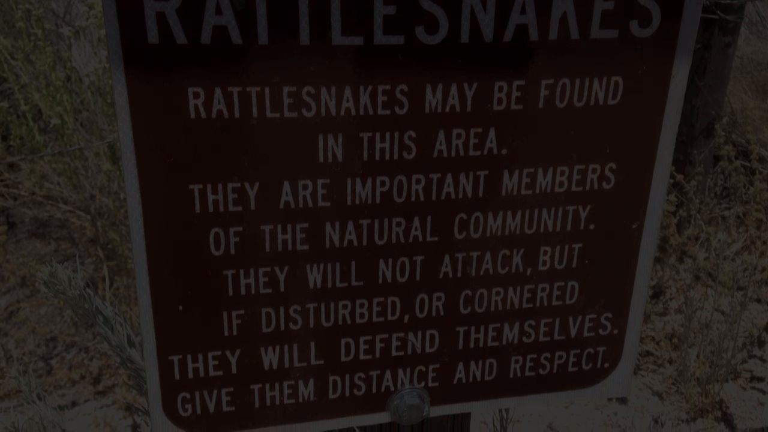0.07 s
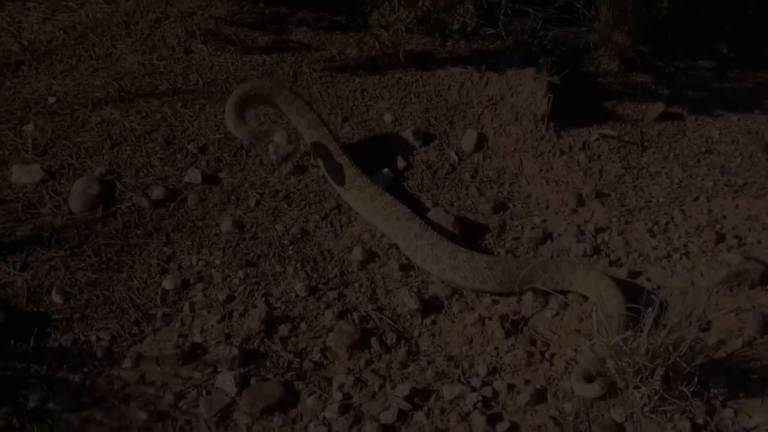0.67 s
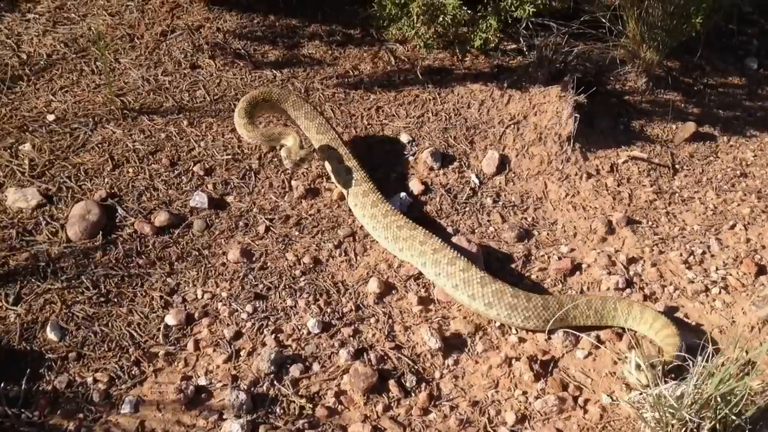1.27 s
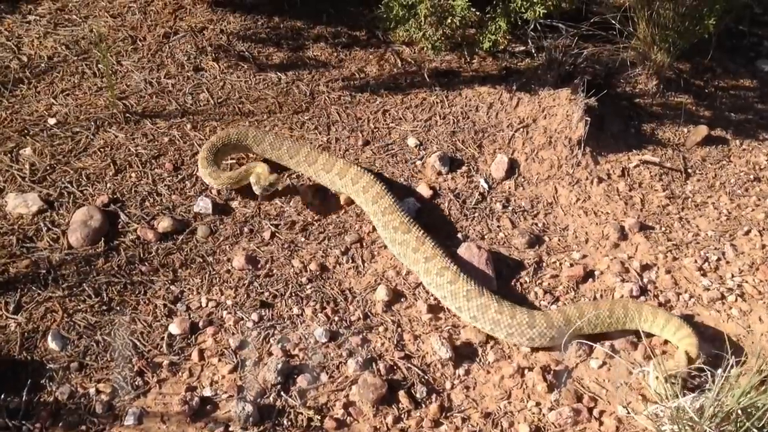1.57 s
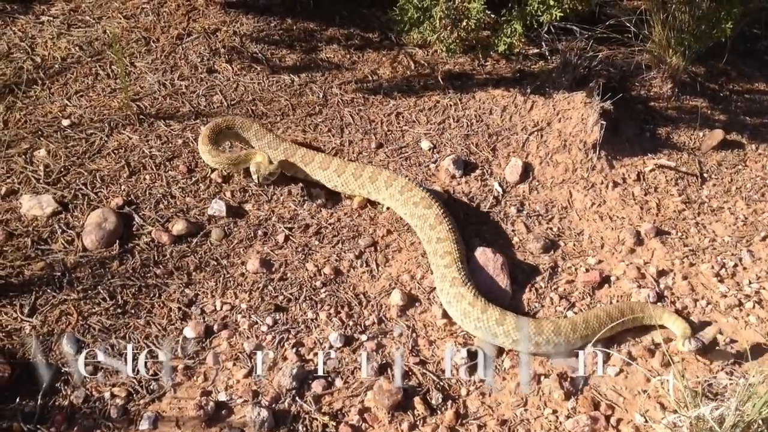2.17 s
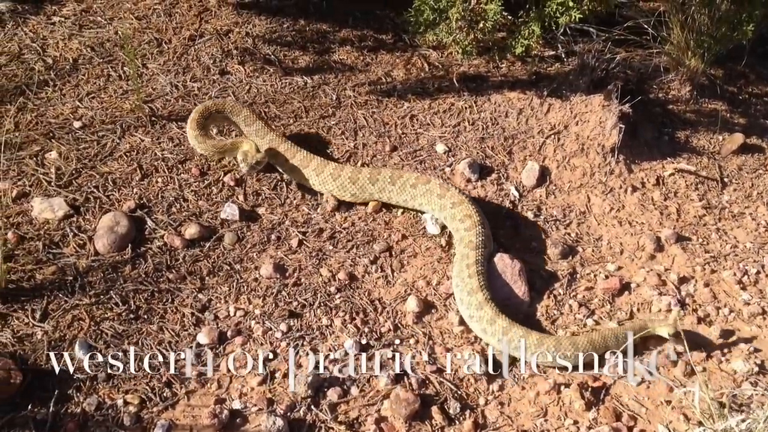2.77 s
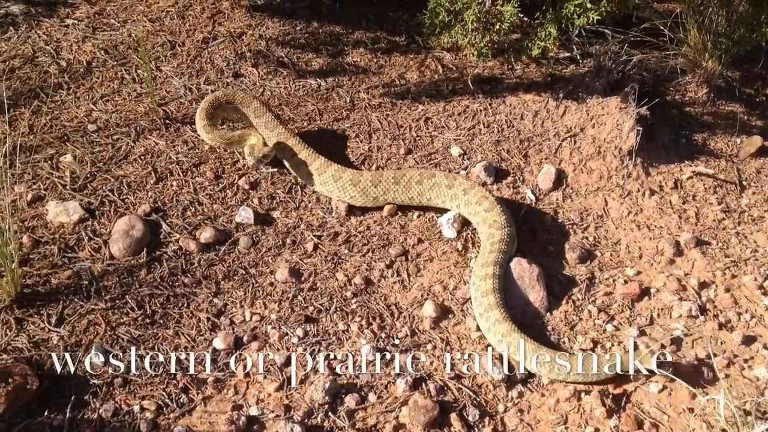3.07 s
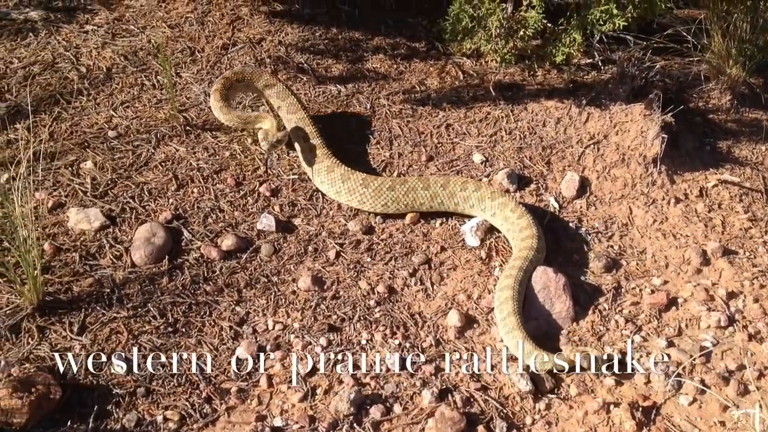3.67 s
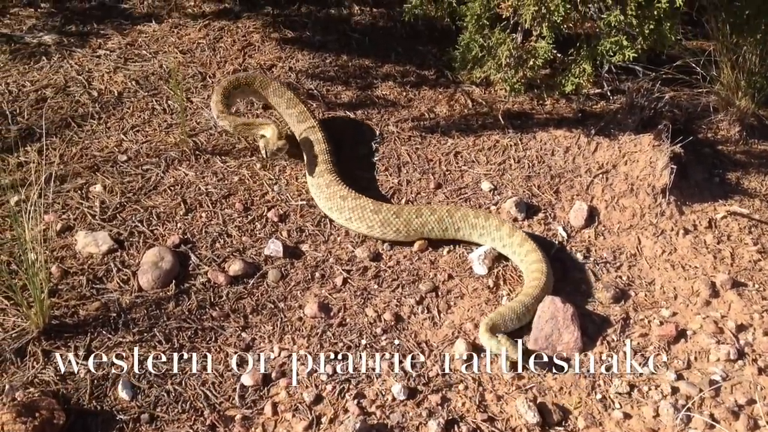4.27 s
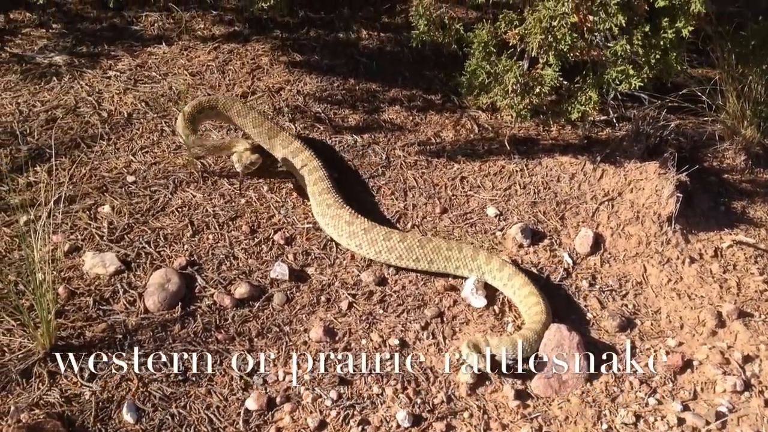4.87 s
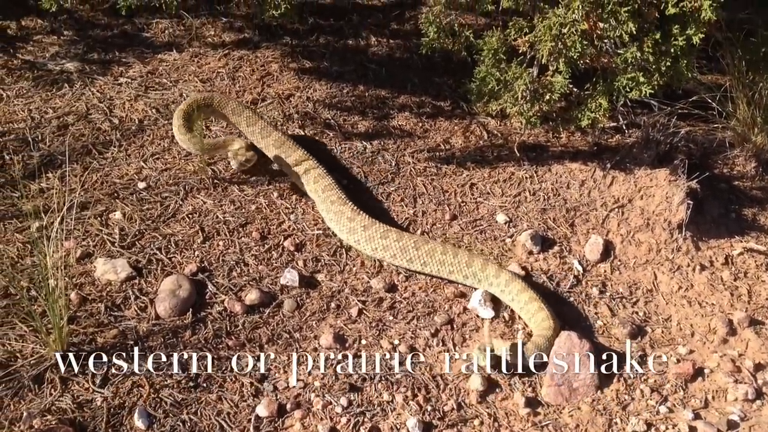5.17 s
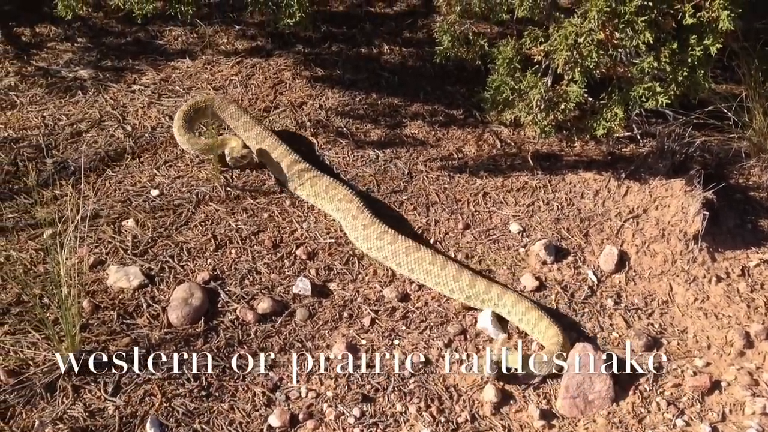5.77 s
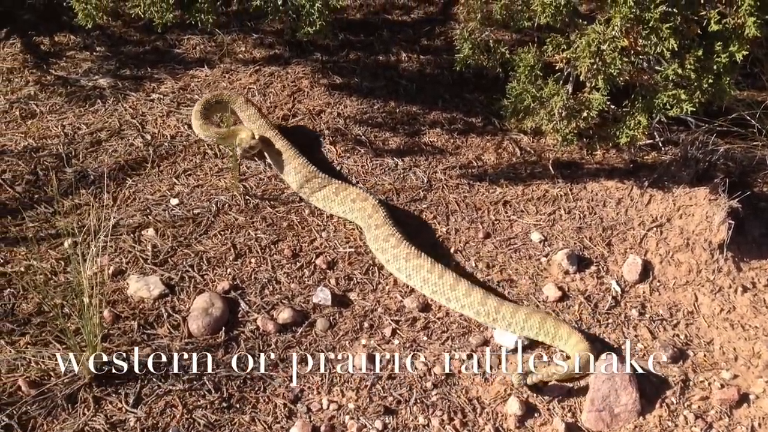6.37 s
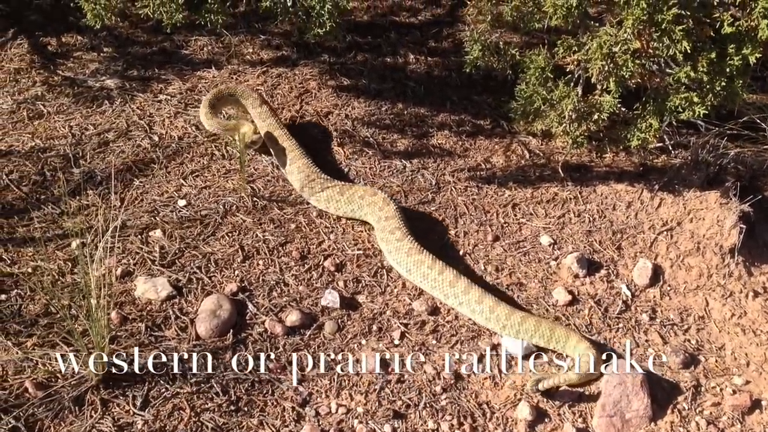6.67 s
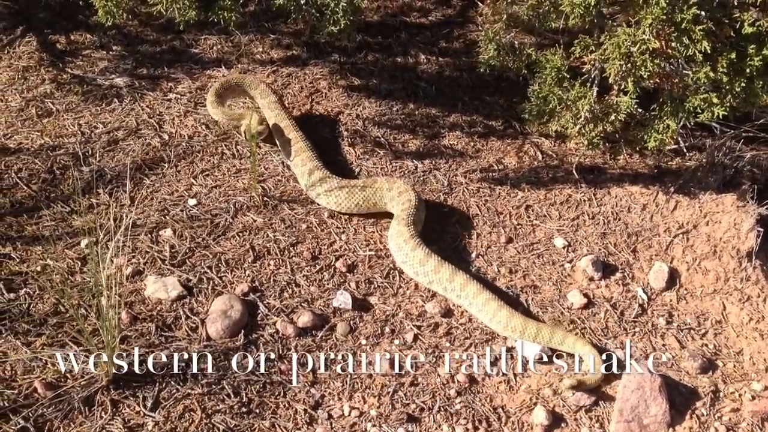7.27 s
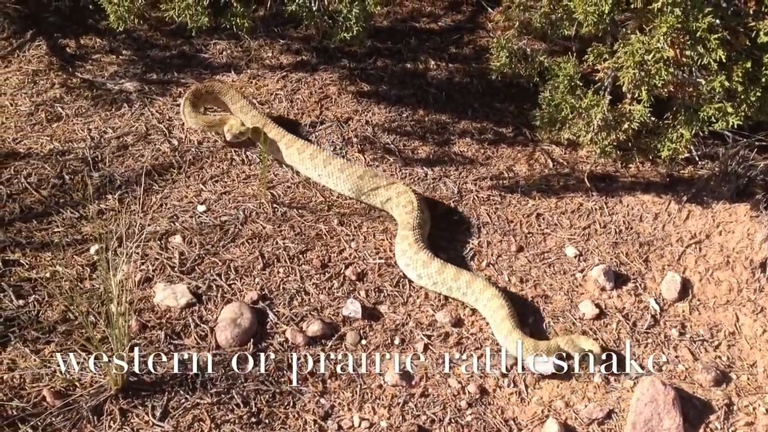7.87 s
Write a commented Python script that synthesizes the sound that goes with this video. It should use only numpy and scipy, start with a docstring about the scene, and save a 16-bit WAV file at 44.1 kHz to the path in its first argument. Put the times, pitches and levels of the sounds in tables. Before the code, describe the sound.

A rattlesnake crawls over dry, open ground. Its dragged rattle gives faint, thin ticks and sizzles, while small pebbles knock, grit snaps and sand rustles briefly under its belly. Light wind rumbles on the microphone over a quiet hush. Past the middle, a distant bird gives six very faint falling notes. Near the end a gust buffets the microphone and the rattle ticks again.

```python
"""Rattlesnake on dry gravel

A rattlesnake crawls over open ground. Its dragged tail rattle ticks and sizzles as the loose
segments click together; pebbles knock, grit snaps and sand slides under its belly. Over a faint
hush, light wind rumbles on the microphone and swells into a gust near the end. A far bird gives
six thin falling notes. The sound fades in after half a second."""
import sys
import numpy as np
from scipy import signal
from scipy.fft import rfft, irfft
from scipy.io import wavfile
from scipy.ndimage import uniform_filter1d

SR = 44100
rng = np.random.default_rng(int(sys.argv[2]) if len(sys.argv) > 2 else 0)


def master_out(mix):
    """Clip the mix to full scale and print it as 16-bit PCM to the path in sys.argv[1]."""
    frames = np.transpose(np.atleast_2d(mix))
    ceiling = np.clip(frames, -1, 1)
    pcm = np.round(ceiling * 32767).astype(np.int16)
    wavfile.write(sys.argv[1], SR, pcm)


N = 348831


def from_db(db):
    """Turn decibels into a number to multiply by."""
    return 10 ** (np.asarray(db) / 20)


def unit_power(x):
    """Scale a signal so that its average power is one."""
    return x / np.sqrt(np.mean(x ** 2) + 1e-20)


def clock():
    """The time of every sample, in seconds."""
    return np.arange(N) / SR


def curve(rows):
    """Join (time, value) points with straight lines, giving one value per sample."""
    return np.interp(clock(), *np.transpose(rows))


def level_at(spectrum, hz):
    """Read a (frequency, level) table between its points, with octaves evenly spaced."""
    points_hz, levels = np.transpose(spectrum)
    return np.interp(np.log(hz), np.log(points_hz), levels)


def drift(rate_hz):
    """A smooth random wobble of typical size one, mostly slower than rate_hz."""
    hz = np.arange(N // 2 + 1) * SR / N
    return unit_power(irfft(rfft(rng.standard_normal(N)) / (1 + (hz / rate_hz) ** 2), N))


def colour(x, spectrum, size=2048):
    """Give a signal the tone in a table; only the differences between its levels count."""
    hz = np.maximum(np.arange(size // 2 + 1) * SR / size, 1)
    bass_cut = np.minimum(hz / spectrum[0][0], 1)
    gain = from_db(level_at(spectrum, hz)) * bass_cut
    # folding the cepstrum makes a filter that rings only after a click, never before it
    cepstrum = irfft(np.log(gain))
    cepstrum[1:size // 2] *= 2
    cepstrum[size // 2 + 1:] = 0
    response = irfft(np.exp(rfft(cepstrum)))
    return signal.fftconvolve(x, response / np.linalg.norm(response))[:N]


def steady(x, span_s):
    """Even out the loudness, holding the power near one over each short span."""
    size = max(int(span_s * SR / 2), 2)
    power = uniform_filter1d(uniform_filter1d(x ** 2, size), size)
    return x / np.sqrt(np.abs(power) + 1e-9)


def grains(per_s, spread_db):
    """Tiny clicks of uneven size at random moments, with an average power of one."""
    sizes = from_db(spread_db * np.minimum(rng.exponential(1, N), 4))
    signs = rng.choice([-1, 1], N)
    happens = rng.random(N) < per_s / SR
    return unit_power(sizes * signs * happens)


def decay(start_s, t60_s):
    """A loudness shape that jumps to one, then falls by 60 dB in t60_s seconds."""
    out, first = np.zeros(N), int(start_s * SR)
    age = np.arange(min(SR // 5, N - first)) / SR
    out[first:first + len(age)] = np.exp(-np.log(1000) * age / max(t60_s, 1e-3))
    return out


def swell(centre_s, half_s):
    """A bell-shaped rise and fall; half_s is about half its length."""
    return np.exp(-.5 * np.minimum(((clock() - centre_s) / half_s) ** 2, 100))


LULL_DB, GUST_DB = -48.5, -28.5   # wind strengths that count as a lull and as a full gust
# Tone of the wind's deep rumble: f/Hz, level/dB
RUMBLE_TONE = [(20, -29), (30, -21), (42, -7), (62, -0.5), (90, -1), (120, -10), (170, -17.5), (260, -35.5),
               (500, -57), (1000, -99.5)]


def rumble(breeze_db, push_power, lull_level_db=-45.5, db_per_wind_db=0.44, lump_db=4):
    """Wind presses on the microphone in soft, deep lumps that grow more slowly than the breeze."""
    level_db = lull_level_db + db_per_wind_db * (breeze_db - LULL_DB) + lump_db * drift(rate_hz=22)
    power = from_db(level_db) ** 2 + push_power
    noise = colour(rng.standard_normal(N), RUMBLE_TONE, size=8192)
    return np.sqrt(power) * steady(noise, span_s=0.079)


# Tone of the buffeting in a lull and in a full gust: f/Hz, level/dB
LULL_TONE = [(120, 0.5), (170, -4.5), (240, -18), (340, -24.5), (480, -38), (680, -61), (960, -70)]
GUST_TONE = [(120, 0.5), (170, -1.5), (240, 4.5), (340, -8.5), (480, -10.5), (680, -26.5), (960, -36)]


def buffeting(wind_power, gain_db=-1, ragged_db=2.04, flutter_db=3.0):
    """Air tumbles at the microphone: faster air is louder, and its smaller whirls sound higher."""
    power = wind_power * from_db(gain_db + ragged_db * drift(rate_hz=41)) ** 2
    gustiness = np.clip((10 * np.log10(power) - LULL_DB) / (GUST_DB - LULL_DB), -.15, 1.05)
    white, noise = rng.standard_normal((2, N)), np.zeros(N)
    edges_hz = 100 * 2 ** (np.arange(8) / 2)   # bands half an octave wide
    for k, (low, high) in enumerate(zip(edges_hz, edges_hz[1:])):
        band = signal.butter(3, [low, high], "band", fs=SR, output="sos")
        hz = np.sqrt(low * high)
        band_db = (1 - gustiness) * level_at(LULL_TONE, hz) + gustiness * level_at(GUST_TONE, hz)
        band_db += flutter_db * drift(rate_hz=25)
        noise += from_db(band_db) * signal.sosfilt(band, white[k % 2])
    muffled = signal.sosfilt(signal.butter(4, 800, fs=SR, output="sos"), noise)
    return np.sqrt(power) * steady(unit_power(muffled), span_s=0.065)


# Strength of the breeze on the microphone: t/s, level/dB
BREEZE = [(0.55, -70.5), (0.9, -90), (1.1, -88), (1.6, -66.5), (1.85, -78), (2.25, -66), (2.52, -89),
          (2.9, -73.5), (3.3, -71), (3.6, -65), (4.1, -80.5), (5.6, -90.5), (5.9, -69), (6.1, -41.5),
          (6.4, -29), (6.62, -38.5), (6.85, -46.5), (6.98, -35.5), (7.09, -43), (7.35, -47), (7.65, -62.5),
          (7.9, -36)]
# Puffs that hit the microphone: t/s, buffeting level/dB, deep push level/dB, half length/s
PUFFS = [(0.677, -58.5, -49, 0.014), (1.06, -71, -50, 0.028), (1.15, -52.5, -44.5, 0.014),
         (1.258, -43.5, -46, 0.0093), (1.428, -49, -48.5, 0.026), (1.734, -75, -48, 0.025),
         (1.943, -54.5, -38, 0.014), (2.03, -57, -47.5, 0.034), (2.159, -51, -64, 0.024),
         (2.371, -45, -42.5, 0.028), (2.893, -52.5, -47.5, 0.015), (2.969, -54.5, -62, 0.018),
         (3.383, -47, -48, .014), (3.531, -50, -42.5, 0.018), (3.642, -50, -37.5, 0.01),
         (3.971, -53.5, -37.5, 0.0044), (4.442, -65, -52, .02), (4.99, -72, -48.5, 0.0073),
         (5.101, -54.5, -52.5, 0.024), (5.425, -63, -44, 0.004), (5.76, -67, -43.5, 0.004),
         (5.963, -50.5, -37, 0.011), (6.083, -39.5, -38.5, 0.019), (6.208, -38, -39, 0.028),
         (6.286, -27, -50, 0.0075), (6.335, -25, -42, .012), (6.391, -28, -44, .02),
         (6.456, -33, -38, 0.0064), (6.54, -23.5, -41, .016), (6.818, -42, -35, 0.0038),
         (7.016, -26, -52, 0.02), (7.193, -43, -33, 0.0074), (7.229, -32.5, -47, 0.0089),
         (7.28, -39.5, -51, .006), (7.338, -40, -53, 0.0088), (7.759, -43, -42, 0.0064),
         (7.829, -32.5, -35.5, 0.0078)]


def wind(wander_db=1, eddy_gain_db=-1, lull_eddy_hz=128.3, db_per_octave=36, swirl_db=-11):
    """A wavering breeze with puffs; each gives a deep push, an eddy (a whirl of air) and a wake."""
    breeze_db = curve(BREEZE) + wander_db * drift(rate_hz=12)
    buffet_power = from_db(breeze_db) ** 2
    push_power, eddies = np.zeros(N), np.zeros(N)
    for t, db, push_db, half_s in PUFFS:
        push_power += (from_db(push_db) * swell(t, 1.86 * half_s)) ** 2
        # the eddy swings the pressure a few times, faster in a stronger puff
        hz = lull_eddy_hz * 2 ** ((db - LULL_DB) / db_per_octave)
        swing = np.sin(2 * np.pi * hz * clock() + rng.uniform(0, 2 * np.pi))
        eddies += from_db(db + eddy_gain_db) * swell(t, .6 * half_s) * swing
        # its wake of finer eddies sits in a longer, weaker swirl
        wake = from_db(db) * swell(t, half_s)
        swirl = from_db(db + swirl_db) * swell(t, 2.3 * half_s)
        buffet_power += wake ** 2 + swirl ** 2
    return rumble(breeze_db, push_power) + eddies + buffeting(buffet_power)


# Tone of the background hush: f/Hz, level/dB
HUSH_TONE = [(100, 14), (250, 8), (420, 12.5), (600, 8), (1000, 2), (1800, -0.5), (3500, -2), (6000, -2.5),
             (9000, -6), (12000, -9.5), (15000, -10.5)]
# Loudness of the hush: t/s, level/dB
HUSH_LEVEL = [(1.65, -69), (1.85, -71), (5.5, -71.5), (7.9, -71)]


def hush():
    """Still outdoor air and microphone hiss make a smooth, faint noise."""
    return from_db(curve(HUSH_LEVEL)) * colour(rng.standard_normal(N), HUSH_TONE)


# Grit and dry stems snapping: t/s, level/dB
SNAPS = [(0.533, -50.5), (2.356, -57), (2.4064, -61), (2.8724, -54), (3.034, -54), (3.1053, -61),
         (4.34, -60), (4.8827, -57.5), (4.95, -57), (5.0804, -60.5), (5.8587, -57.5)]
# Tone of a snap: f/Hz, level/dB
SNAP_TONE = [(600, 6), (1500, -5.5), (3500, -4.5), (7000, -2), (10500, -7), (15000, -13)]


def grit_snaps(gain_db=-1, t60_s=0.009):
    """A bit of grit or a dry stem snaps under the snake in a tiny burst of noise."""
    loudness = sum(from_db(db + gain_db) * decay(t, t60_s) for t, db in SNAPS)
    return colour(loudness * rng.choice([-1, 1], N), SNAP_TONE)


# Pebbles knocking together: t/s, level/dB, f/Hz
KNOCKS = [(0.7618, -56.5, 1350), (0.887, -57, 1140), (1.0612, -48, 3260), (1.063, -56, 3500),
          (1.267, -54.5, 1230), (1.512, -62.5, 830), (1.578, -57.5, 1150), (1.616, -62.5, 1280),
          (1.643, -57, 625), (1.836, -61, 726), (2.164, -62, 890), (2.579, -60, 596), (2.631, -53, 620),
          (2.655, -54.5, 607), (2.662, -57, 1170), (2.954, -57.5, 1200), (3.033, -67, 1900),
          (5.856, -55.5, 432), (6.912, -64, 700)]


def pebble_knocks(gain_db=-3, rise_s=0.00019, crack_db=-20):
    """Stone scuffs on stone: a dry crack and one dull ring that dies almost at once."""
    out, age = np.zeros(N), np.arange(SR // 20) / SR
    for t, db, hz in KNOCKS:
        t60_s = 0.026 * np.sqrt(1500 / hz)   # bigger, deeper stones stay in contact longer
        loudness = (1 - np.exp(-age / rise_s)) * np.exp(-np.log(1000) * age / t60_s)
        scuff = loudness * rng.standard_normal(len(age))
        ring = signal.lfilter(*signal.iirpeak(hz, Q=3.2, fs=SR), scuff)
        band = signal.butter(3, [hz / 2, min(3.5 * hz, hz + 2800)], "band", fs=SR, output="sos")
        knock = signal.sosfilt(band, ring + from_db(crack_db) * scuff)
        knock /= np.std(knock[:SR // 200])   # the first 5 ms set the level
        first = int(t * SR)
        out[first:first + len(age)] += from_db(db + gain_db) * knock
    return out


# The tail is dragged along: t/s, level/dB, half length/s
TAIL_DRAGS = [(0.814, -68, 0.027), (0.928, -60.5, 0.036), (1.258, -63, 0.013), (1.451, -66.5, 0.019),
              (1.598, -64, .012), (1.664, -67.5, 0.018), (2.742, -70.5, 0.0087), (2.96, -70, 0.031),
              (3.145, -76.5, 0.078), (6.18, -75, 0.04), (7.165, -71.5, 0.033), (7.516, -75, 0.035),
              (7.755, -66.5, 0.012)]
# The rattle catches on a stone and jolts hard: t/s, level/dB
TAIL_JOLTS = [(0.8753, -49), (0.8874, -51), (0.9073, -55), (0.9164, -51), (1.0208, -51), (1.1677, -54),
              (1.1896, -53.5), (1.2446, -50), (1.291, -53), (1.3303, -53), (1.36, -53), (1.396, -48.5),
              (1.4484, -50.5), (1.482, -50.5), (1.5938, -54), (1.6724, -50), (1.721, -53), (1.7617, -53.5),
              (2.726, -58), (2.7896, -61), (2.9402, -61), (2.9711, -60), (5.227, -56), (5.242, -50),
              (6.6383, -53), (7.0797, -50.5), (7.0944, -54), (7.1282, -46), (7.1714, -51.5), (7.221, -53),
              (7.3533, -53.5), (7.5378, -55)]
# Tone of the rattle's clicks: f/Hz, level/dB
RATTLE_TONE = [(1500, -30), (3000, -12), (4300, -9), (5300, -7.5), (6200, -6), (7000, -5), (8500, -7),
               (10500, -9.5), (11800, -24.5), (15000, -14.5)]


def tail_rattle(drag_gain_db=-3, jolt_gain_db=-7.5, shiver_db=5.0, small_jolts_per_s=27,
                small_jolt_db=3.5, shell_hz=5950, shell_db=2):
    """Loose, hard segments click together: a thin sizzle while dragged, a tight burst at each jolt."""
    drag = sum(from_db(db + drag_gain_db) * swell(t, half_s) for t, db, half_s in TAIL_DRAGS)
    shiver = from_db(shiver_db * drift(rate_hz=70))
    sizzle = drag * shiver * grains(per_s=1800, spread_db=4.5)
    # small jolts come by chance during a drag; the hard ones come from the table
    catches = from_db(small_jolt_db) * drag * (rng.random(N) < small_jolts_per_s / SR)
    for t, db in TAIL_JOLTS:
        catches[int(t * SR)] += from_db(db + jolt_gain_db)
    jolts = signal.fftconvolve(catches, decay(0, t60_s=0.038))[:N]
    jolts = uniform_filter1d(jolts, size=SR // 700)   # a jolt takes a moment to run through the segments
    chatter = steady(grains(per_s=2200, spread_db=0.0), span_s=0.0039)
    clicks = colour(sizzle + jolts * chatter, RATTLE_TONE)
    shell_ring = signal.lfilter(*signal.iirpeak(shell_hz, Q=9, fs=SR), clicks)
    return clicks + from_db(shell_db) * shell_ring


# The belly slides over sand: t/s, level/dB, half length/s
SLIDES = [(1.25, -63, 0.0065), (1.983, -62.5, 0.014), (2.657, -67, 0.015), (3.02, -72, 0.047),
          (4.389, -66.5, 0.0074), (5.788, -69.5, 0.055), (6.658, -70, .028), (7.64, -71.5, .067)]
# Tone of the shifting sand: f/Hz, level/dB
SAND_TONE = [(300, 11), (700, 16.5), (1500, -1.5), (3500, 3.5), (6500, -3), (10000, -1), (15000, -13)]


def belly_slides(gain_db=-1):
    """Belly scales shift fine grains, whose many tiny clicks blend into a short rustle."""
    loudness = sum(from_db(db + gain_db) * swell(t, half_s) for t, db, half_s in SLIDES)
    return colour(loudness * grains(per_s=12000, spread_db=8.0), SAND_TONE)


def bird(start_s=4.768, every_s=.152, notes=6, hold_s=.04, drop_s=.037,
         whistle_hz=5780, sag_hz_per_s=2500, drop_hz_per_s=55000, flicker_db=2.5):
    """Each note holds a thin, sagging whistle, then slides steeply down; moving air blurs it."""
    out = np.zeros(N)
    age = np.arange(-SR // 10, SR // 10) / SR   # zero is where the steep drop begins
    glide_hz = whistle_hz - sag_hz_per_s * age - drop_hz_per_s * np.clip(age, 0, 2 * drop_s)
    waver_hz = 130 * drift(rate_hz=250)
    shape = np.exp(-(age / np.where(age < 0, hold_s, drop_s)) ** 4)
    level = from_db(np.interp(age, [0, drop_s / 2], [-81, -79]))   # a little louder into the drop
    for t in start_s + every_s * np.arange(notes):
        span = int(t * SR) + np.arange(len(age)) - SR // 10
        phase = 2 * np.pi * np.cumsum(glide_hz + waver_hz[span]) / SR
        out[span] += level * shape * np.sin(phase)
    return out * from_db(flicker_db * drift(rate_hz=40))


def scene():
    """Add all the sounds into one channel; open ground gives no echo."""
    mix = wind() + hush() + grit_snaps() + pebble_knocks() + tail_rattle() + belly_slides() + bird()
    return mix[None]


def record(dry, fade_start_s=0.437, fade_end_s=0.496, cutoff_hz=15400):
    """Fade in from silence and cut away the highest treble."""
    fade = np.clip((clock() - fade_start_s) / (fade_end_s - fade_start_s), 0, 1) ** 2
    treble_cut = signal.ellip(12, .1, 80, cutoff_hz, fs=SR, output="sos")
    return signal.sosfilt(treble_cut, dry * fade)


dry = scene()
out = record(dry)
master_out(out)
```